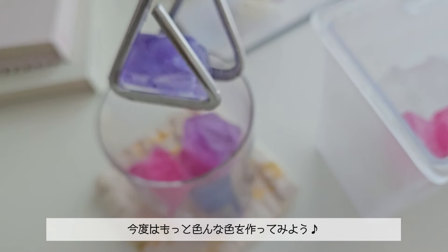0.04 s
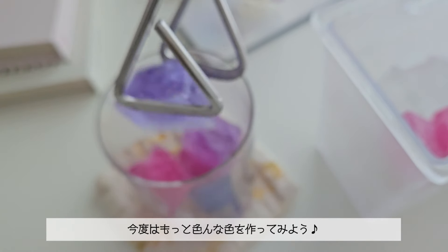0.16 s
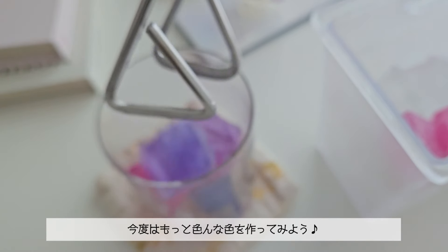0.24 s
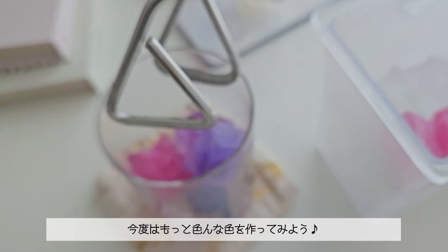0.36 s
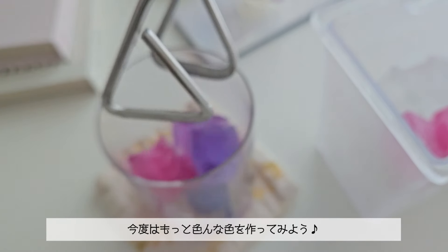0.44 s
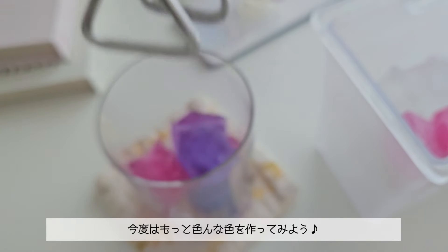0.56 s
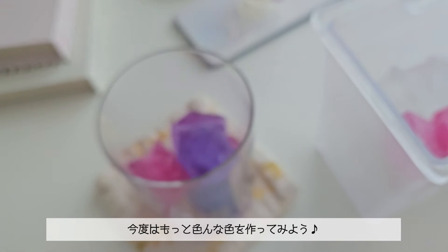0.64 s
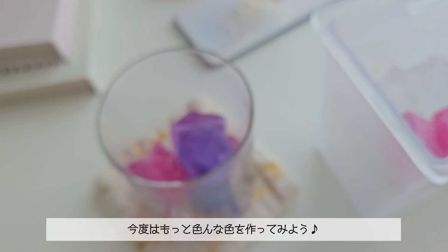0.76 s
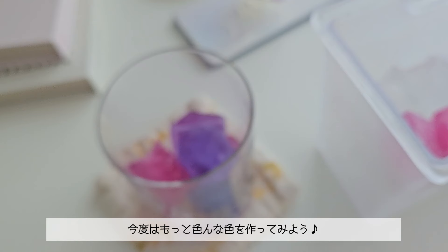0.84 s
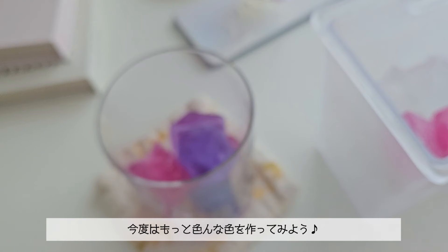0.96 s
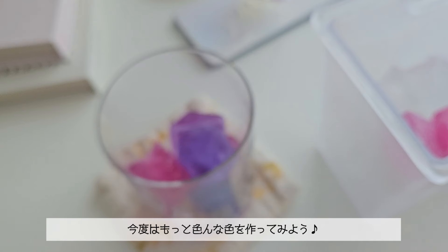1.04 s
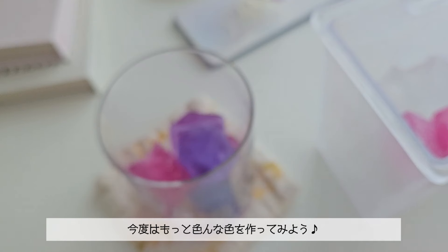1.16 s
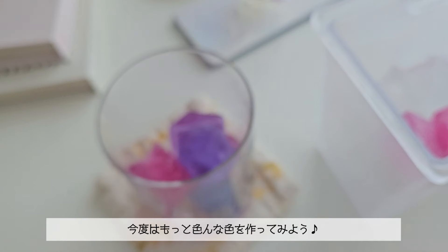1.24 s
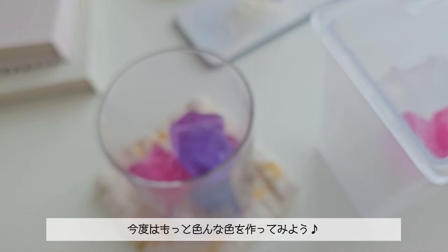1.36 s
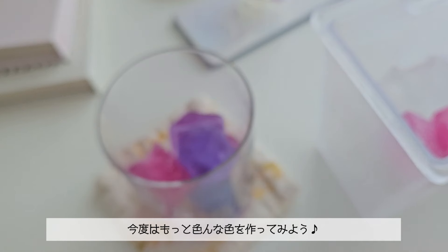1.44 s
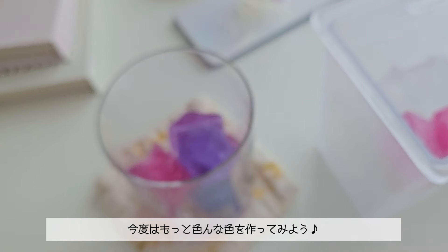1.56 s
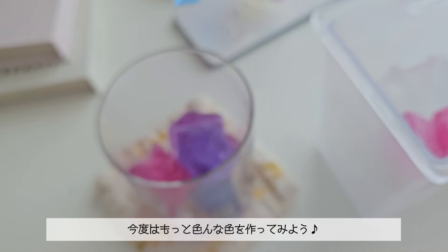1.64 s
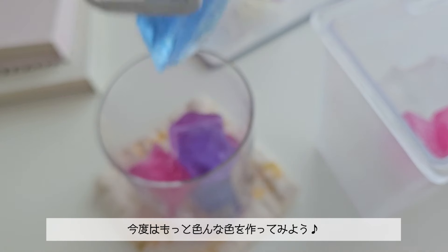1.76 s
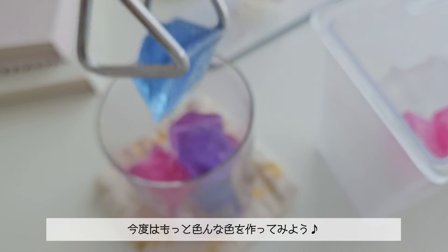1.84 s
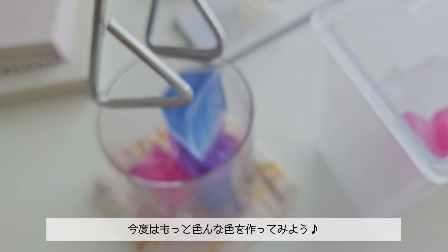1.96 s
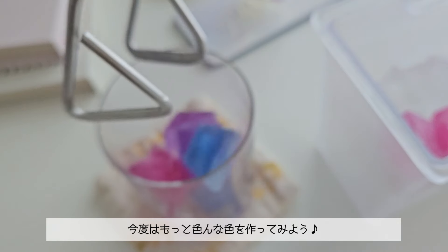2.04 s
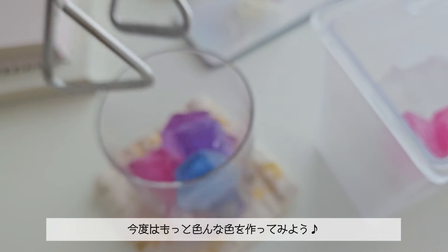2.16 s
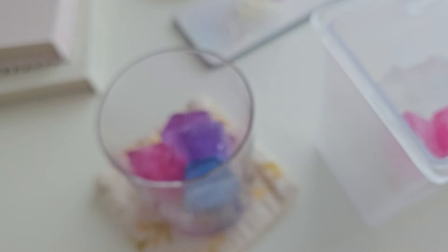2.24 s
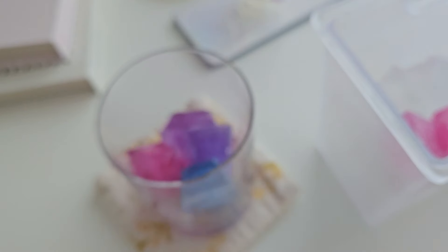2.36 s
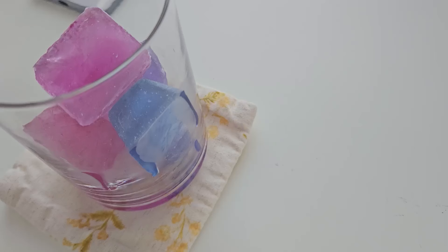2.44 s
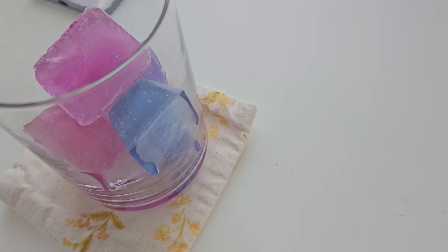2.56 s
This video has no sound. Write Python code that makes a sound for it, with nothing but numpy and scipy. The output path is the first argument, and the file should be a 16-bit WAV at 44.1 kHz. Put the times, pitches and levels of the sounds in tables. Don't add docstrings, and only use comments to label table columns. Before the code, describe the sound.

Two ice cubes drop separately into a glass tumbler, clinking sharply and rattling to rest.

```python
import sys
import numpy as np
from scipy import signal
from scipy.fft import rfft, irfft, next_fast_len
from scipy.io import wavfile
from scipy.ndimage import uniform_filter1d, map_coordinates

SR = 44100
rng = np.random.default_rng(int(sys.argv[2]) if len(sys.argv) > 2 else 0)


def makeup_ratio(level_db):
    decades = np.asarray(level_db, float) / 20
    return 10 ** decades


def dump_mix(stems):
    frames = np.atleast_2d(stems).T
    limited = np.clip(frames, -1, 1)
    pcm = np.round(limited * 32767).astype(np.int16)
    wavfile.write(sys.argv[1], SR, pcm)


N = 114660


def cubes():
    # air column/dB, rim/dB, base/dB
    first_cube = [(0.2449, -11.5, -13, 9.5, 0.5), (0.2668, -19.5, -27.5, -8.5, 2),
                  (0.2793, -16.5, -24.5, -0.5, -2.5), (0.2905, -14, -22.5, 5.5, 10),
                  (0.3016, -23, -4, -3, -3.5), (.3098, -18.5, -23.5, -8, -2.5), (0.3197, -26, -25, -5, 10),
                  (.3310, -24, -24.5, -7, -1.5), (0.3447, -27, -16.5, -13, -9),
                  (0.3507, -27, -24, -10, -5.5), (0.3592, -38, -16, -4.5, -3.5),
                  (.368, -34.5, -22.5, -11, -6), (.387, -32, -19.5, -14, -17.5),
                  (0.4023, -35, -6.5, -12, -17.5), (0.4298, -39.5, -3.5, -13.5, -12.5),
                  (0.4507, -48, -6, -8.5, 0.5), (0.524, -49, 2, -9.5, -11.5), (0.5518, -59, 2, -17, -8.5)]
    second_cube = [(1.9885, -9, -12, -8, -16), (1.9947, -15, -9, 6.5, -5), (2, -19, -2.5, 2.5, 0.5),
                   (2.0165, -28, -30, -7.5, -6.5), (2.0591, -22, -18.5, -8, -3.5),
                   (2.0897, -24, -16.5, -7.5, -4.5), (2.1316, -19.5, -8, -7.5, -10),
                   (2.1515, -28, -7, -16, -16.5), (2.1762, -33.5, -8, -25, -17.5),
                   (2.2256, -23.5, -15.5, -12.5, -5), (2.2478, -44, -8, -15, -0.5),
                   (2.3057, -43.5, -6, -17.5, -14.5), (2.3127, -38, -2, -25.5, -23.5),
                   (2.3634, -69, -8, -22.5, -22)]
    # wall modes, air modes (each f/Hz, level/dB, t60/s), free ring/dB
    ice_fill = [
        ([(2015.6, -2, .045), (1784, -10.5, 0.0255)], [(1920, -18.5, 0.14)], 0),
        ([(2114.8, -1.5, 0.0013), (1745, -7.5, 0.0256)], [(1839.7, 0.5, 0.0237)], -8.5),
    ]
    # t/s, level/dB
    far_ticks = [
        (.085, -58),
        (.14, -56),
        (1.599, -46),
    ]
    # f/Hz, level/dB
    tick_colour = [(200, -4), (1000, 0), (2500, -4), (5000, -16), (16000, -40)]
    rise_s, left_db = .0006, .6
    t = np.arange(SR * 2 // 5) / SR
    cracks, rings = np.zeros((2, 2, N + SR))
    for cube, (wall, air, free_db) in zip((first_cube, second_cube), ice_fill):
        for s, db, air_db, rim_db, base_db in cube:
            span = slice(round(s * SR), round(s * SR) + len(t))
            blow = glass(t, wall, air, free_db, air_db, rim_db, base_db)
            blow += ice_noise(t, db=-4, t60_s=0.068)
            rings[:, span] += makeup_ratio(db) * blow * (1 - np.exp(-t / rise_s))
            cracks[:, span] += makeup_ratio(db) * ice_noise(t, db=5, t60_s=0.0051074)
    for s, db in far_ticks:
        span = slice(round(s * SR), round(s * SR) + len(t))
        cracks[:, span] += burst(t, makeup_ratio(db - 60 * t / 0.015), tick_colour)
    return np.array([cracks, rings])[..., :N] * makeup_ratio([[left_db], [-left_db]])


def glass(t, wall, air, free_db, air_db, rim_db, base_db):
    # f/Hz, level/dB, t60/s
    wall_modes = [(1199, -20, 0.13), (1503.6, -16.5, 0.02), (2469.7, -12, 0.12), (3010, -11, 0.065),
                  (3411, -8.5, 0.035), (4074.7, -19.5, 0.24), (4887, -16, .03)]
    table_modes = [(77, -33, 0.36), (270, -34, .1)]
    air_modes = [(880.06, 0, 0.049)]
    rim_modes = [(6298, -7, 0.025), (6464, 2, .03)]
    base_modes = [(7414, -6, .03), (7363.3, 1.5, .03), (8543, -4.5, .04), (9368, -12.5, .06),
                  (12333, -26.5, 0.091), (12448, -24.5, 0.055), (13440, -27, 0.05), (15866, -16.5, .04)]
    # f/Hz, level/dB, t60/s
    free_rim = [(6300, -34.5, .36), (6340, -34.5, 0.51)]
    free_base = [(7330, -39.5, .36), (7250, -35.5, .4), (8310, -41, 0.53), (9440, -44.5, .25)]
    # f/Hz, level/dB
    sparkle_colour = [(4000, -26), (6000, -8), (9300, -7), (10500, -12.5), (11500, -10.5), (13500, -11),
                      (15600, -9.5), (16300, -31.5)]
    sparkle_db, sparkle_t60_s = -2.5, 0.062
    body = ring(wall_modes + wall + table_modes, t)
    column = makeup_ratio(air_db + 6) * ring(air_modes + air, t)
    rim = makeup_ratio(rim_db) * (ring(rim_modes, t) + makeup_ratio(free_db) * ring(free_rim, t))
    base = makeup_ratio(base_db) * (ring(base_modes, t) + makeup_ratio(free_db) * ring(free_base, t))
    sparkle = burst(t, makeup_ratio(sparkle_db - 60 * t / sparkle_t60_s), sparkle_colour)
    return body + column + rim + base + makeup_ratio(base_db / 2) * sparkle


def ring(modes, t):
    scatter_db, detune = 2, .004
    rough, rough_s, rough_above_hz = .45, .005, 4000
    wall_lag_s, base_lag_s, base_above_hz = .000125, .000108, 5500
    hz, db, t60_s = np.transpose(modes)[..., None]
    level_dev, phase, lead_dev, pitch_dev = rng.standard_normal((4, len(modes), 1))
    high = np.minimum(hz / rough_above_hz, 1)
    rattle = uniform_filter1d(rng.standard_normal((2, len(modes), len(t))), round(rough_s * SR))
    rattle *= rough * high * np.sqrt(rough_s * SR)
    pitch = 2 * np.pi * hz * (1 + detune * pitch_dev)
    wave = makeup_ratio(db + scatter_db * level_dev - 60 * t / t60_s) * np.exp(1j * (pitch * t + phase))
    wave = wave * (1 + rattle[0] + 1j * rattle[1])
    lag_s = np.where(hz > base_above_hz, base_lag_s, wall_lag_s)
    lead = np.exp(1j * (pitch * lag_s / 2 + .3 * high * lead_dev))
    return np.array([np.sum(wave * lead, 0).imag, np.sum(wave / lead, 0).imag])


def ice_noise(t, db, t60_s):
    # f/Hz, level/dB
    crack_colour = [(300, -23.5), (900, -8.5), (2000, 0), (3800, 5), (6000, -5), (10000, -11), (15600, -12),
                    (16400, -36)]
    return burst(t, makeup_ratio(db - 60 * t / t60_s), crack_colour)


def burst(t, fade, colour):
    lag_s = np.array([[0], [.00015]])
    noise = rng.standard_normal(len(t)) * fade
    return filtered(noise, lambda hz: makeup_ratio(along(colour, hz)) * np.exp(-2j * np.pi * hz * lag_s))


def kitchen(x):
    # f/Hz, t60/s
    room_t60 = [(300, .35), (900, .25), (2500, .3), (6000, .28), (12000, .22)]
    hz, t, z = signal.stft(rng.standard_normal((2, SR // 2)), SR, nperseg=256)
    fade = makeup_ratio(-60 * t / along(room_t60, hz)[:, None])
    tail = signal.istft(z * fade, SR, nperseg=256)[1]
    tail = tail / np.linalg.norm(tail[0])
    delayed = np.pad(x, ((0, 0), (200, 0)))
    return signal.fftconvolve(delayed, tail, axes=1)[:, :N]


def background():
    # f/Hz, level/dB per Hz
    hum_colour = [(12, -30.5), (20, -6), (50, -1.5), (129, -22.5), (170, -18), (267, -18.5), (297, -16.5),
                  (360, -18), (520, -28.5), (680, -64.5), (1140, -120)]
    hiss_colour = [(260, -26), (450, -9.5), (800, -3), (1700, -13.5), (3090, -11.5), (5300, -18.5),
                   (6200, -25.5), (16000, -39)]
    # f/Hz, width/Hz, level over hum/dB
    drone_bands = [(160, 46, -11), (274.5, 30, -8), (8600, 600, -36)]
    # t/s, level/dB
    hum_level = [(0.0, -60.5), (0.36, -55), (0.57, -62), (1.32, -59), (1.66, -62), (2.01, -62.5),
                 (2.17, -56), (2.6, -61)]
    hiss_db = -74
    low = makeup_ratio(1.5 * wobble(6.8)) * rush(lambda hz: makeup_ratio(along(hum_colour, hz)))
    for centre_hz, width_hz, db in drone_bands:
        low += makeup_ratio(db) * rush(lambda hz: 1 / (1 + ((hz - centre_hz) / width_hz) ** 2 * 4))
    level = makeup_ratio(np.interp(np.arange(N) / SR, *np.transpose(hum_level)))
    hiss = makeup_ratio(hiss_db + 0.55 * wobble(12)) * rush(lambda hz: makeup_ratio(along(hiss_colour, hz)))
    return level * low + hiss


def rush(gain):
    # f/Hz, likeness/1
    likeness = [(40, .98), (150, .92), (400, .72), (950, .3), (3770, .12), (15000, .07)]

    def mid_side(hz):
        turn = np.arccos(np.clip(along(likeness, hz), -1, 1)) / 2
        return gain(hz) * np.array([np.cos(turn), np.sin(turn)])

    mid, side = filtered(rng.standard_normal((2, N)), mid_side)
    return unit(np.array([mid + side, mid - side]))


def wobble(rate_hz):
    knots = rng.standard_normal(int(N / SR * rate_hz) + 4)
    return map_coordinates(knots, [np.arange(N) * rate_hz / SR])


def filtered(x, response):
    m = next_fast_len(x.shape[-1] + 4096)
    return irfft(rfft(x, m) * response(np.fft.rfftfreq(m, 1 / SR)), m)[..., :x.shape[-1]]


def along(points, hz):
    f, v = np.transpose(points)
    return np.interp(np.log(hz + 1), np.log(f + 1), v)


def unit(x):
    return x / np.sqrt(np.mean(x ** 2) + 1e-20)


def scene():
    # f/Hz, width/Hz
    weak_bands = [(10550, 890), (14450, 950)]
    hole_db, kitchen_db = -24, -17.5

    def notches(hz):
        gain = np.ones_like(hz)
        for centre_hz, width_hz in weak_bands:
            gain *= 1 - (1 - makeup_ratio(hole_db)) * np.exp(-(2 * (hz - centre_hz) / width_hz) ** 6)
        return gain

    cracks, rings = cubes()
    echo = makeup_ratio(kitchen_db) * kitchen(cracks + rings)
    return cracks + filtered(rings + echo, notches) + background()


def low_pass(x):
    return signal.sosfilt(signal.butter(12, 16410, fs=SR, output="sos"), x)


def record(dry):
    smear_db, top_hz = -22, 16300
    stop_s, fade_in_s = 2.48, .022
    z = signal.stft(np.clip(dry, -1, 1), nperseg=2048, noverlap=1536)[2]
    scrambled = abs(z) * np.exp(2j * np.pi * rng.random(z.shape))
    smear = signal.istft(scrambled, nperseg=2048, noverlap=1536)[1][:, :N]
    mix = np.clip(dry + makeup_ratio(smear_db) * smear, -1, 1)
    mix = filtered(mix, lambda hz: hz < top_hz)
    after_s = np.arange(N) / SR - stop_s
    mix = mix * np.where(after_s < 0, 1, np.clip(after_s / fade_in_s, 0, 1))
    return low_pass(mix)


dry = scene()
out = record(dry)
dump_mix(out)
```